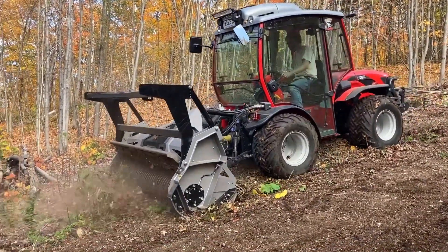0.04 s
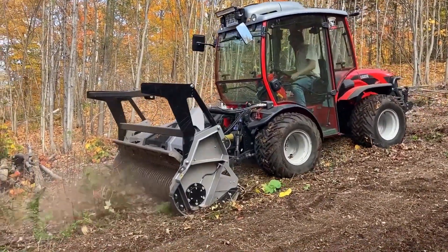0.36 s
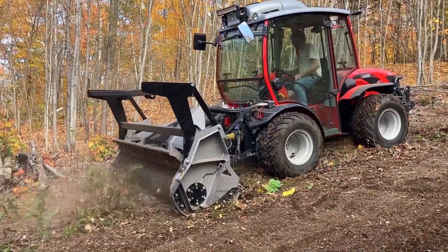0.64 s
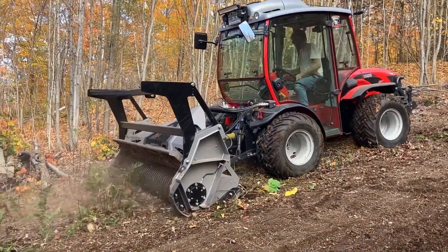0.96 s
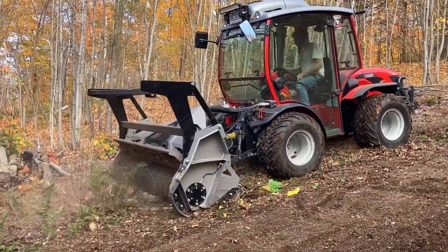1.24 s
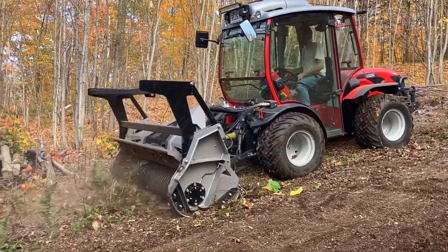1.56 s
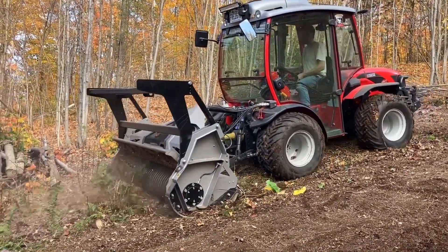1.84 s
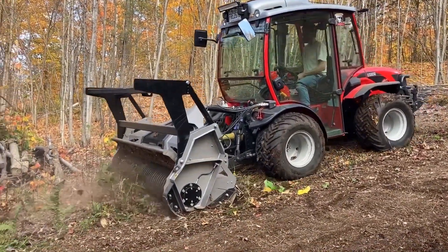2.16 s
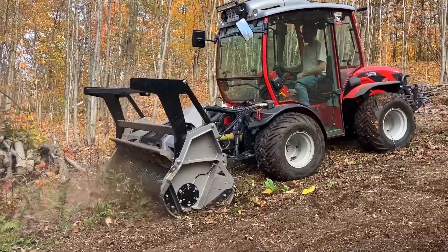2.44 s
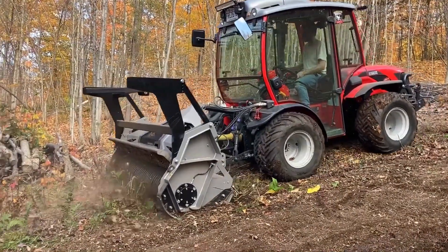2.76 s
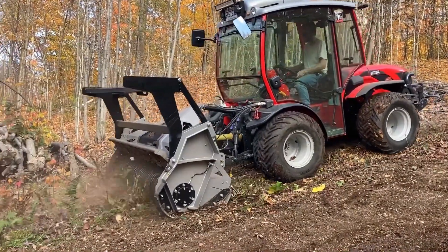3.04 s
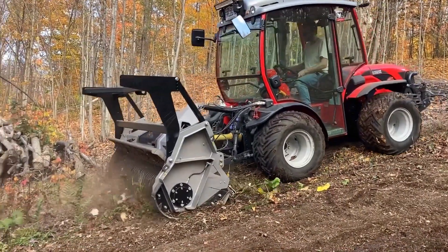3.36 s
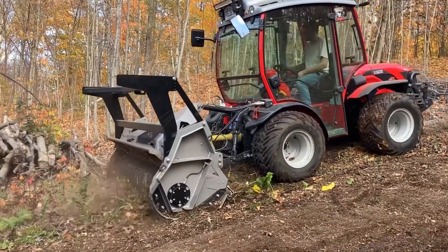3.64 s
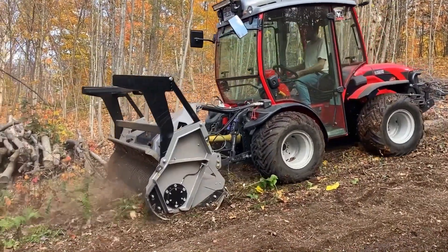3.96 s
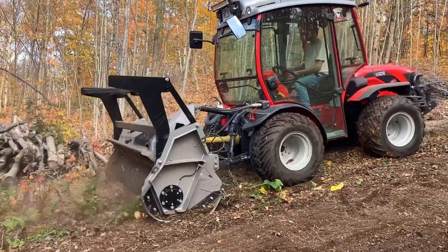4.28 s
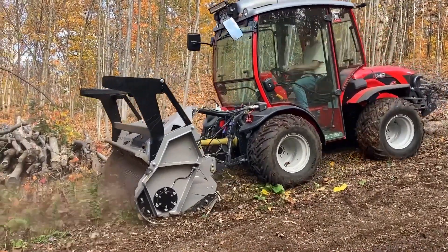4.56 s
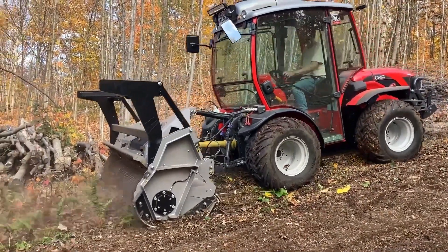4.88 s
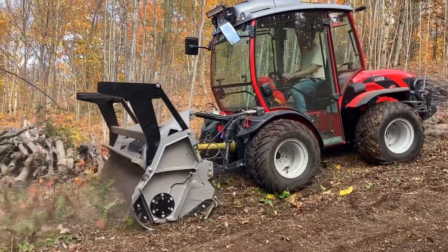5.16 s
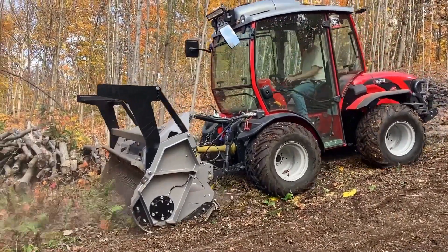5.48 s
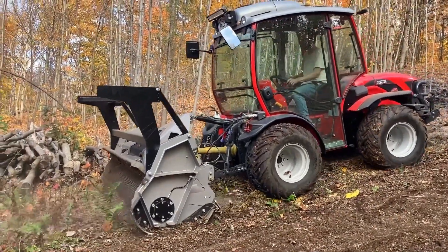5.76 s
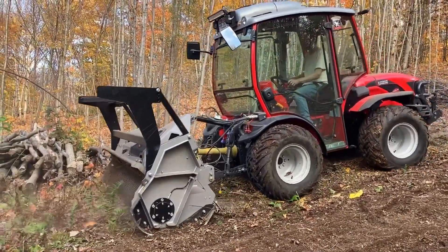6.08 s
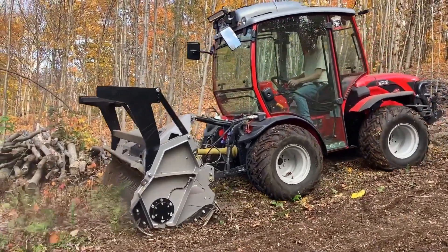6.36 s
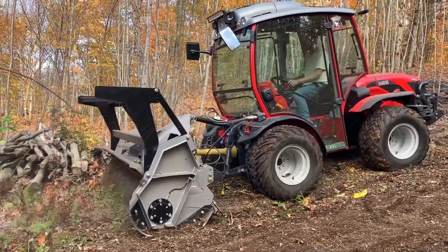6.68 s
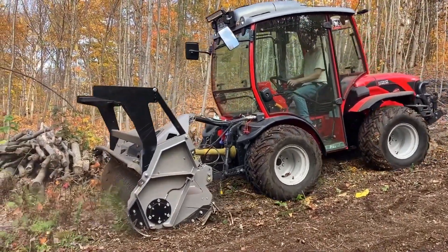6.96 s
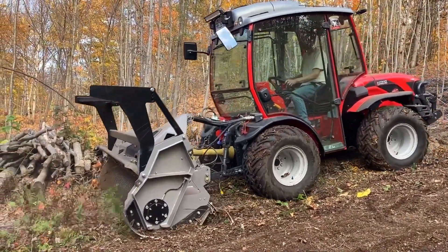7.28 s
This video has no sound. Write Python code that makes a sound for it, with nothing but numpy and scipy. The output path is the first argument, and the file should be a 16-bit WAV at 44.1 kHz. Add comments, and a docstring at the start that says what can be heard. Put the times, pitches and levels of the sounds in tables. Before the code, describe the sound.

A few metres away at the edge of a wood, a diesel tractor drones and clatters while its mulcher drum shreds brush in surges. Twigs snap, chunks knock against the steel hood, and chips and grit spray out. A little past halfway the drum pounds into thick wood and the engine bogs down, then recovers with a rising gear whine as the shredding thins.

```python
"""The toothed drum of a forestry mulcher chews through brush, a few metres away at the edge of a wood.
It thumps once a turn, shreds wood against its steel hood and sprays chips and grit.
Underneath, the diesel tractor that drives it drones and clatters. Near 4.3 s the drum bites into
something thick: the engine bogs down, then recovers with a rising gear whine."""
import sys
import numpy as np
from scipy import signal
from scipy.fft import rfft, irfft
from scipy.io import wavfile
from scipy.ndimage import uniform_filter1d

SR = 44100
rng = np.random.default_rng(int(sys.argv[2]) if len(sys.argv) > 2 else 0)


def dump_mix(stems):
    """Bounce the given channels to the path in sys.argv[1] as a 16-bit WAV at rate SR."""
    frames = np.atleast_2d(stems).T  # one column per channel
    limited = np.clip(frames, -1, 1)  # hard clip at full scale
    pcm = np.round(limited * 32767).astype(np.int16)
    wavfile.write(sys.argv[1], SR, pcm)


N = 327222
T = np.arange(N) / SR

# bright spectrum of a snap on a tooth: freq_hz, level_db
SNAP_SPECTRUM = [(2000,-23),(4500,-16),(5800,6.5),(7200,5),(9500,10),(12000,3),(16000,-1.5)]


def undb(db):
    """Decibels to gain."""
    return 10 ** (np.asarray(db) / 20)


def unit(x):
    """Scale to rms 1."""
    return x / np.sqrt(np.mean(x ** 2))


def together(*levels_db):
    """Level in dB of several unrelated sounds at once."""
    return 10 * np.log10(sum(undb(db) ** 2 for db in levels_db))


def curve(points):
    """Join (time_s, value) points, one value a sample."""
    return np.interp(T, *np.transpose(points))


def across(points):
    """Join (freq_hz, value) points on a log axis, one value an FFT bin."""
    hz, value = np.transpose(points)
    return np.interp(np.log(np.arange(N // 2 + 1) * SR / N + 1), np.log(hz + 1), value)


def colour(x, spectrum):
    """Causal filter with the given spectrum; rms 1."""
    cepstrum = irfft(np.log(undb(across(spectrum))), N)
    cepstrum[1:N // 2] *= 2
    cepstrum[N // 2 + 1:] = 0
    return unit(irfft(rfft(x) * np.exp(rfft(cepstrum)), N))


def ring(x, modes):
    """Drive a set of damped resonances; rms 1."""
    f = np.arange(N // 2 + 1) * SR / N
    response = sum((-1) ** k * undb(db) * 1j * f * width / (hz ** 2 - f ** 2 + 1j * f * width)
                   for k, (hz, width, db) in enumerate(modes))
    return unit(irfft(rfft(x) * response, N))


def walk(rate_hz):
    """Smooth random wander; rms 1."""
    step = max(int(SR / rate_hz), 2)
    held = np.repeat(rng.standard_normal(N // step + 2), step)
    return unit(uniform_filter1d(uniform_filter1d(held, step), step)[:N])


def noise():
    """Stereo white noise: one part is shared, the rest arrives by scattered paths."""
    # likeness of left and right: freq_hz, shared_power_fraction
    likeness = [(100,0.97),(350,0.99),(800,0.733),(1500,0.552),(2000,0.595),(3000,0.49),(6000,0.486),(8000,1),(15000,0.778)]
    alike = np.clip(across(likeness), 0, 1)
    spectra = rfft(rng.standard_normal((3, N)))
    return irfft(np.sqrt(alike) * spectra[0] + np.sqrt(1 - alike) * spectra[1:], N)


def grains(per_s, scatter_db):
    """Dense tiny impacts of unequal size, each a very short burst of noise."""
    hits = rng.random(N) < per_s / SR
    sizes = hits * undb(scatter_db * np.minimum(rng.exponential(size=N), 5))
    power = signal.lfilter([1], [1, -np.exp(-1 / (0.000658 * SR))], sizes ** 2)
    return unit(noise() * np.sqrt(power))


def throb(cycles, depth, decay):
    """A surge at the start of each cycle that dies within a share of it."""
    return unit(1 + depth * np.exp(-(cycles % 1) / decay))


def partial(turns, multiple, rough):
    """A tone at a multiple of the turning rate, uneven in strength and timing."""
    wobble = 1 + rough * (walk(22) + 1j * walk(22))
    return np.real(wobble * np.exp(2j * np.pi * multiple * turns))


def repeating(turns, size=256):
    """A pattern of contacts that comes round on every turn and slowly changes."""
    out = 0
    for _ in range(2):
        pattern = irfft(np.exp(2j * np.pi * rng.random(size // 2 + 1)))
        out = out + walk(3) * np.interp(turns % 1, np.arange(size) / size, pattern, period=1)
    return out / np.sqrt(uniform_filter1d(out ** 2, SR // 10) + 1e-9)


def swell(start_s, length_s, level_db, attack_s, fall_db_per_s):
    """Level in dB of one contact: it builds up, holds, then dies away."""
    rise = np.clip((T - start_s) / attack_s, 1e-6, 1)
    return level_db + 20 * np.log10(rise) - fall_db_per_s * np.maximum(T - start_s - length_s, 0)


def blows(events, decay_s, tail_db, tail_s):
    """Envelope of sudden blows, each with a quick fall and a longer tail."""
    envelope = np.zeros(N)
    for s, db in events:
        start = int(s * SR)
        age = T[:N - start][:SR // 4]
        shape = np.exp(-age / decay_s) + undb(tail_db) * np.exp(-age / tail_s)
        envelope[start:start + len(age)] += undb(db) * shape
    return envelope


def struck(events, spectrum, decay_s, tail_db, tail_s):
    """Each blow is a hard first contact and a short crumbling, heard through one spectrum."""
    contacts = np.zeros(N)
    for s, db in events:
        contacts[int(s * SR)] += undb(db)
    force = 4 * contacts + noise() * blows(events, decay_s, tail_db, tail_s)
    return colour(force, spectrum) * np.sqrt(np.mean(force ** 2))


def singing_panels(turns, fade_s=0.1415):
    """Shaft harmonics swell and fade as the load shifts and the body panels resonate."""
    # panel tones: start_s, length_s, shaft_harmonic, level_db
    tones = [(0.056, 0.572, 16, -36), (0.35, 1.345, 7, -42), (4.13, 0.31, 6, -29), (4.33, 0.21, 17, -33.5),
             (4.55, 0.31, 15, -38), (4.526, 0.93, 7, -28.5), (4.6, 0.52, 12, -35), (5.019, 0.3237, 17, -33),
             (5.019, 0.478, 19, -34.5), (5.168, 0.595, 12, -40.5), (5.823, 0.522, 17, -35),
             (5.647, 1.4, 6, -34), (5.85, 0.997, 8, -35)]
    out = 0
    for start, length, harmonic, db in tones:
        fade = np.clip(np.minimum(T - start, start + length - T) / fade_s, 0, 1)
        tone = unit(partial(turns + rng.random(), harmonic, rough=0.4))
        out = out + tone * np.sin(np.pi / 2 * fade) * undb(db)
    return out


def gear_whine(turns, speed, fuel):
    """Gears sing under torque, loudest at their case's resonances; backlash makes them flutter."""
    # faint overtones and sidebands, played slightly flat: mesh_multiple, shaft_offset, level_db
    side_tones = [(1, -2, -48), (1, 2, -48.5), (1, 1, -53), (3, 0, -53.5), (4, 0, -61.5), (4, 2, -59)]
    mesh_per_turn, case_hz, case_width_hz = 29.55, 1139, 29.3
    upper_case_hz, upper_width_hz = 2066.4, 74
    entry = np.clip((T - 4.72) / 0.057, undb(-15.5), 1)  # faint until the engine has bogged
    mesh = mesh_per_turn * turns + 0.0744 * walk(70)
    mesh_hz = mesh_per_turn * speed
    lift_db = 12 / (1 + (2 * (mesh_hz - case_hz) / case_width_hz) ** 2)
    tone = unit(partial(mesh, 1, rough=0.42)) * undb(-48 + 10 * fuel + lift_db + 1.2 * walk(5))
    octave_detune = 2 * (2 * mesh_hz - upper_case_hz) / upper_width_hz
    octave = unit(partial(mesh, 2, rough=0.43)) * undb(-37) / np.hypot(1, octave_detune)
    sides = sum(unit(partial(k * mesh + offset * turns, 0.981, rough=0.81)) * undb(db)
                for k, offset, db in side_tones)
    return entry * (tone + octave + sides)


def diesel_clatter(turns, clatter_db):
    """Diesel knock twice a turn, and a rattle of the drive that rings the guard panels."""
    # spectrum of knock and rattle: freq_hz, level_db
    spectrum = [(200,-24.5),(440,-8),(520,-2),(640,1),(810,0),(920,-11),(1150,-4),(1550,-10),(2000,-18),(2700,-11.5),(3400,-15.5),(5500,-19.5),(16000,-48)]
    # sharp resonances of the thin guard panels: pitch_hz, width_hz, level_db
    panel_modes = [(617.1,52,0),(684.3,36.4,4.5),(802.8,31,-5),(1142.9,25.3,3),(1250,21,-4.5),(1426.6,10.1,-0.5),(1790,10.8,-18),(2093.6,45.5,-5)]
    knock = colour(noise() * throb(2 * turns, depth=0.15, decay=0.071), spectrum)
    contacts = repeating(turns) * undb(2.63 * walk(30))
    rattle = colour(contacts, spectrum) * undb(-3)
    panels = ring(contacts + 0.5 * noise(), panel_modes) * undb(-7.5)
    tight = np.clip((clatter_db + 35.5) / 12, .05, .7)  # torque takes up slack: a regular rattle
    return (np.sqrt(1 - tight) * knock + np.sqrt(tight) * rattle + panels) * undb(clatter_db)


def drive_drone(turns, speed, fuel, pound_db, drone_db, boom_db):
    """Four cylinders hum and rumble; under load the drum adds its thump and the hood booms."""
    # the engine running free: harmonic, level_db
    free_harmonics = [(1,-21.5),(2,-4),(3,0.5),(4,3),(5,0.5),(6,-1),(7,-5.5),(8,-8),(9,-9),(10,-13)]
    # the engine while the drum pounds on wood: harmonic, level_db
    loaded_harmonics = [(1,-17),(3,-8.5),(4,3),(5,-1.5),(6,-2.5),(7,-5),(8,-6),(9,-4.5),(10,-5),(11,-7.5),(12,-9.5),(13,-11),(14,-11)]
    # low rumble of the engine: freq_hz, level_db
    rumble_spectrum = [(20,-56.5),(40,-27.5),(60,-12),(90,-9),(125,-9),(160,-1.5),(200,-8),(280,-6),(340,-12),(420,-27.5),(700,-40.5),(2000,-75)]
    belt_ratio = 0.99  # engine turns per drum turn, so the two beat
    load = np.clip((pound_db + 39) / 10, 0, 1)
    bog = np.clip((pound_db + 27) / 5, 0, 1)
    labour = np.maximum(load, fuel ** 2)  # a labouring engine fires hard and evenly
    tuned = np.clip(speed - 38 + 0.34, 0, 1)  # at full speed four tooth rows meet the hood's pitch
    lag = rng.random(size=16)  # pipe and body resonances delay each harmonic by part of a turn
    free = unit(sum(undb(db) * partial(belt_ratio * turns - lag[k], k, rough=0.392)
                    for k, db in free_harmonics))
    buzz = unit(sum(undb(db + 2.5 * walk(4)) * partial(turns - lag[k], k, rough=0.25)
                    for k, db in loaded_harmonics))
    hum = (1 - 0.484 * labour) * free * undb(-3.5) + labour * buzz * undb(-6.5 - 0.47 * bog)
    thump = np.sqrt(load) * drum_thump(turns, tuned, bog) * undb(pound_db + 0.89 - 6.56 * bog)
    rumble = colour(noise() * throb(turns, depth=0.245, decay=0.72), rumble_spectrum)
    rumble *= undb(-5 - 3.91 * labour + 4.43 * bog)
    boom = tuned * partial(turns - lag[4], 4, rough=0.324) * undb(boom_db)
    return thump + (hum + rumble) * undb(drone_db) + boom


def chip_ticks(spray_db, faint_per_s=7.5, rise_s=0.00116, decay_s=0.0064):
    """Chips land on the housing and ring it briefly, each spot at its own pitch."""
    # distinct ticks: start_s, level_db, pitch_hz
    ticks = [(1.773, -34, 4270), (1.86, -32, 4430), (1.923, -31, 4400), (2.242, -32, 4280),
             (2.7, -32, 4450), (2.718, -27, 4392), (3.0235, -31.5, 4440), (3.5074, -32, 4380),
             (3.5329, -32, 4460), (3.562, -33, 4435), (3.6411, -31.5, 4500), (3.6985, -28.5, 4480),
             (6.985, -34.5, 4520)]
    faint_ticks = []
    for when, softness, spot in rng.random((round(faint_per_s * T[-1]), 3)):
        s = when * T[-1]
        db = np.interp(s, T, spray_db) - 14 - 8 * softness
        faint_ticks.append((s, db, 4555 + 221 * (2 * spot - 1)))
    out = np.zeros((2, N))
    for s, db, hz in [*ticks, *faint_ticks]:
        start = int(s * SR)
        age = T[:N - start][:SR // 20]
        cluster_hz = hz + 290 * rng.uniform(-1.036, 1, size=(5, 1))
        phases = rng.random(size=(5, 1)) + 0.74 * rng.random(size=(2, 5, 1))
        tone = np.sin(2 * np.pi * (cluster_hz * age + phases)).sum(axis=1) / np.sqrt(5)
        envelope = (1 - np.exp(-age / rise_s)) * np.exp(-age / decay_s)
        out[:, start:start + len(age)] += 2 * undb(db) * tone * envelope
    return out


def grit_spray(turns, spray_db, fuel):
    """Grit and dry leaves patter on steel and ground, duller when the drum slows."""
    # the spray at full speed: freq_hz, level_db
    spectrum = [(800,-29.5),(2500,-17),(4400,1.5),(5800,-5),(7400,0.5),(9000,3),(10500,2),(12500,0.5),(15500,-7.5)]
    # softer throw of a slowed drum: freq_hz, change_db
    dulling = [(4400, 1), (7300, -0.5), (10500, -5), (15000, -5)]
    gusts = throb(turns, depth=0.41, decay=0.215) * undb(walk(45))
    fast = colour(grains(per_s=5500, scatter_db=3.5) * gusts, spectrum)
    slow = irfft(rfft(fast) * undb(across(dulling)), N)
    return ((1 - fuel) * fast + fuel * slow) * undb(spray_db + 4.5)


def soil_thuds(pitch_hz=158):
    """The drum hits clods and roots with a dull thud."""
    # thuds: start_s, level_db
    thuds = [(2.558, -29.5), (2.935, -20.5), (3.059, -22), (3.225, -26.5), (3.684, -18.5), (3.758, -20),
             (3.989, -17.5), (4.719, -15.5), (7.405, -18)]
    tone = np.sin(2 * np.pi * pitch_hz * T + walk(40))
    return tone * blows(thuds, decay_s=0.0164, tail_db=-24.5, tail_s=0.048)


def wood_knocks():
    """Chunks of wood split and knock against the hood."""
    # chunks: start_s, level_db
    chunks = [(0.441, -25.5), (2.491, -26), (2.564, -20), (2.909, -23), (2.933, -22.5), (2.96, -25),
              (3.062, -23.5), (3.329, -27.5), (4.434, -24), (4.595, -25), (4.734, -22.5)]
    # wood on the steel hood: freq_hz, level_db
    knock_spectrum = [(100,-25.5),(300,-1.5),(700,10),(1300,10),(2000,-19),(3500,5),(6000,-28),(16000,-69)]
    # wood splitting along its grain: freq_hz, level_db
    crack_spectrum = [(500, -22), (1200, -2.5), (3700, -0.5), (8000, -10.5), (16000, -23.5)]
    knocks = struck(chunks, knock_spectrum, decay_s=0.0029, tail_db=-4, tail_s=0.0222)
    cracks = colour(grains(per_s=2500, scatter_db=1.5), crack_spectrum)
    cracks *= blows(chunks, decay_s=0.003, tail_db=-6, tail_s=0.0164)
    return knocks + cracks * undb(-4.5)


def twig_snaps(turns, spray_db, small_per_s=2, rehit_db=2):
    """Twigs and stones snap and ping the teeth; a few are hit again, harder, on the next turns."""
    # big snaps: start_s, level_db, ping_offset_db, hit_count
    big_snaps = [(0.0448, -21.5, -11, 1), (0.2857, -19, -1, 1), (0.3102, -18.5, -8.5, 1),
                 (0.3611, -22, -10, 1), (0.4135, -18, -19.5, 1), (0.4393, -16, -12, 1),
                 (0.9129, -24, -10.5, 1), (1.4117, -26, -3.5, 1), (1.848, -23, -5.5, 1),
                 (1.9228, -20.5, -16, 1), (1.9709, -14.5, -23.5, 1), (2.1603, -20, -2.5, 1),
                 (2.212, -21, -4.5, 1), (2.4656, -26, -13, 1), (2.4912, -19.5, -26.5, 1),
                 (2.675, -21, -4.5, 2), (2.908, -17, -5, 2), (2.958, -19, -0.5, 1), (2.942, -24, -8, 1),
                 (3.033, -18, 0.5, 1), (3.229, -22, -16, 1), (3.2782, -16.5, -10.5, 1),
                 (3.4187, -25, -15.5, 1), (3.436, -22.5, -16.5, 1), (3.7485, -25.5, 5, 1),
                 (4.067, -20, -20.5, 1), (4.861, -23, 4, 1), (5.031, -21, -1.5, 1), (5.09, -29, 1.5, 1),
                 (5.147, -22, -17.5, 1), (5.206, -20, -7, 1), (6.606, -22.5, -7.5, 1),
                 (6.672, -23.5, -1.5, 1), (6.8302, -25, -1, 2), (6.933, -26, -4, 3), (7.0346, -21, -1, 1),
                 (7.061, -12.5, -3, 1), (7.2466, -26, -4.5, 1), (7.322, -23, -18.5, 1)]
    # ring of the steel teeth: pitch_hz, width_hz, level_db
    tooth_modes = [(3502,190,2),(4423,123,6),(4965,290,5.5),(7200,272,5),(8370,87,0.5)]
    hits = []
    for s, db, ping, count in big_snaps:
        first_turn = np.interp(s, T, turns)
        hits += [(np.interp(first_turn + k, turns, T), db + k * rehit_db, ping) for k in range(count)]
    chances = rng.random(int(turns[-1]))  # small snaps come at random, riding on the spray's level
    for turn, (size, hardness) in enumerate(rng.standard_normal((len(chances), 2))):
        if chances[turn] < small_per_s * T[-1] / turns[-1]:
            s = np.interp(turn, turns, T)
            hits.append((s, np.interp(s, T, spray_db) + 10 + 2.9 * size, 0.5 + 3 * hardness))
    snap_hits = [(s, db) for s, db, _ in hits]
    ping_hits = [(s, db + ping) for s, db, ping in hits]
    snaps = struck(snap_hits, SNAP_SPECTRUM, decay_s=0.0016, tail_db=-18, tail_s=0.013)
    pings = ring(noise(), tooth_modes) * blows(ping_hits, decay_s=0.00277, tail_db=0, tail_s=0.0222)
    return snaps * undb(-2) + pings * undb(-12)


def wood_rasp(turns):
    """Teeth saw through thick wood in rough strokes, twice a turn."""
    # the rasp: freq_hz, level_db
    spectrum = [(1500,-29),(2600,-20),(3000,4),(3500,-8.5),(4400,-2),(5500,-8.5),(9000,-23),(16000,-37.5)]
    strokes = grains(per_s=2800, scatter_db=-1.5) * throb(2 * turns, depth=1.03, decay=0.35)
    rasp_db = swell(start_s=4, length_s=0.35, level_db=-34, attack_s=0.05, fall_db_per_s=72.5)
    return colour(strokes, spectrum) * undb(rasp_db)


def stump_chops(turns, at_turn=0.115, decay_turns=0.131, attack_s=0.063):
    """One proud tooth chops at a stump on every turn: a hard woody knock with a crack on top."""
    # runs of chopping: start_s, length_s, level_db, fall_db_per_s
    runs = [(-0.02, 0.73, -35, 19), (1.27, 0.217, -36, 60.5), (4.348, 0.395, -27.5, 110),
            (5.042, 1.172, -44, 24.5)]
    # the woody knock: freq_hz, level_db
    spectrum = [(200,-25),(450,-9.5),(620,3.5),(850,-6.5),(1120,4.5),(1400,-6.5),(1600,-3.5),(2100,-3.5),(2420,2),(2750,-22),(3500,-19),(6000,-22),(16000,-33)]
    chop_db = together(*(swell(s, length, db, attack_s, fall) for s, length, db, fall in runs))
    since_hit = (turns - at_turn) % 1
    blow = np.exp(-since_hit / decay_turns) * undb(1.2 * walk(40))
    knock = colour(blow * (noise() + 0.78 * repeating(turns)), spectrum)
    crack = colour(blow * grains(per_s=13000, scatter_db=8.5), SNAP_SPECTRUM)
    return (knock + crack * undb(-14)) * undb(chop_db)


def drum_thump(turns, tuned, bog):
    """Low harmonics line up in one blow a turn; a bogged engine barks on the third and fourth."""
    # ring of the hood's hollow at full speed: shaft_harmonic, level_db
    hollow_harmonics = [(4, 4), (5, -0.5), (7, -5.5)]
    phase = turns - 0.5  # the blow falls halfway through the turn
    thump = (1 - 0.31 * tuned) * partial(phase, 2, rough=0.02)
    thump += (0.777 + 0.9 * bog) * partial(phase, 3, rough=0.095)
    thump += 0.87 * bog * partial(phase, 4, rough=0.075)
    hollow = sum(undb(db) * partial(phase, k, rough=0.16) for k, db in hollow_harmonics)
    thump += tuned * (1 - bog) * hollow
    return -thump * undb(0.55 * walk(28))  # no two blows are equally hard


def drum_shredding(turns, shred_db, pound_db):
    """Teeth tear fibres in a surge on each turn; splinters crackle and ring the hood and its lip."""
    # the steel hood: pitch_hz, width_hz, level_db
    hood_modes = [(622,127,-13.5),(807,33,-14.5),(1166.4,41,-16.5),(1291,45,-7),(1406.8,9,-2),(1761.7,84.4,4),(1911.6,60.8,6),(2024.7,72.4,1.5),(3364,548,-10),(4634,260,-16.5)]
    # the hood's front lip: pitch_hz, width_hz, level_db
    lip_modes = [(2397, 104, 0)]
    # crackle of splinters: freq_hz, level_db
    splinter_spectrum = [(300,-30),(700,-1),(1200,2),(2200,2),(2800,-2),(3500,-12),(5000,-5.5),(8000,-13.5),(16000,-34.5)]
    surge = throb(turns, depth=0.146, decay=0.6) * undb(1.366 * walk(35))
    chips = (grains(per_s=3500, scatter_db=2.5) + 0.387 * repeating(turns)) * surge
    pressed = np.clip((pound_db + 32.5) / 10, 0, 1)  # a log pressing on the lip quiets it
    hood = ring(chips, hood_modes) * undb(1.5)
    lip = ring(chips, lip_modes) * undb(-4.5 - 6 * pressed)
    splinters = colour(grains(per_s=900, scatter_db=2.8) * surge, splinter_spectrum)
    return (hood + lip + splinters * undb(-6)) * undb(shred_db)


def stereo_image(x):
    """The sound reaches the two microphone ports out of step and at unequal levels."""
    # phase between the ports: freq_hz, left_lead_rad
    phase = [(0, 0), (1210, 0.23), (2410, 2.11), (2670, 2.11), (3360, 1), (4820, 4.0), (5600, 2.7),
             (6030, 2.16), (6720, 0.78), (9560, -3.7), (13200, -9.1), (14000, -9.5), (15200, -12.4),
             (16400, -12.5)]
    # balance between the ports: freq_hz, left_minus_right_db
    balance = [(60, -1.3), (110, -1.35), (200, -0.73), (380, -0.18), (700, -1.49), (1290, 0.68),
               (2380, 0.68), (4400, -1.1), (8120, -0.57), (15000, 0.0)]
    side = np.array([[.5], [-.5]])
    ports = undb(side * across(balance)) * np.exp(1j * side * across(phase))
    return irfft(rfft(x) * ports, N)


def scene():
    """Engine and drum share one drive line: its speed sets the rhythm, the bites lift the levels."""
    # shaft speed: time_s, rate_hz
    shaft_speed = [(0, 38.52), (0.4, 38.86), (1.35, 40.01), (1.9, 40.6), (3.1, 39.59), (4.15, 39.75),
                   (4.4, 38.63), (4.65, 35.72), (5.1, 34.66), (5.85, 35.28), (6.35, 36.5), (7.1, 39.06),
                   (7.42, 39.47)]
    # spray of dry leaves and grit under the drum: time_s, level_db
    litter = [(0, -35.5), (1.45, -44), (1.85, -39), (2.45, -41.5), (2.85, -41.5), (3.0, -37.5), (3.3, -37),
              (5.3, -36), (6.3, -45), (7.42, -49.5)]
    # teeth bite into wood, then the pieces clear from the hood:
    # start_s, attack_s, length_s, shred_db, boom_db, fall_db_per_s
    bites = [(-0.2, 0.197, 0.41, -25.5, -38, 14), (1.162, 0.082, 0.1017, -33.5, -43.5, 65.5),
             (1.74, 0.0867, 0.0847, -36.5, -45, 79.5), (2.468, 0.065, 0.1107, -29, -54.5, 72.5),
             (2.859, 0.203, 0.247, -26, -26.5, 31.5), (3.585, 0.06, 0.104, -34, -52.5, 15),
             (4.14, 0.087, 0.175, -26, -26.5, 33), (4.275, 0.195, 0.3213, -22, -40, 26.5),
             (4.656, 0.051, 0.095, -29, -40, 69.5), (4.613, 0.65, 0.825, -33.5, -31, 6)]
    # the drum rides on a log or stump and pounds it: start_s, length_s, level_db, fall_db_per_s
    pounds = [(-0.2, 1.29, -38, 34), (0.324, 0.128, -34, 61.5), (4.308, 0.444, -16.5, 89),
              (4.998, 1.256, -29.5, 58), (7.147, 0.19, -35.5, 49.5)]
    governed_hz, droop_hz = 40.86, 3.82
    soil_pound_db, pound_attack_s = -39.5, 0.105
    speed = curve(shaft_speed)
    turns = np.cumsum(speed * (1 + 0.0019773 * walk(12))) / SR
    fuel = np.clip((governed_hz - speed) / droop_hz, 0, 1)  # the governor adds fuel as speed sags

    light_brush_db = -42 - 3.5 * np.maximum(T - 6.01, 0)  # the brush thins out at the end
    shred_db = together(light_brush_db, *(swell(s, length, db, attack, fall)
                                          for s, attack, length, db, _, fall in bites))
    boom_db = together(*(swell(s, length, db, attack, fall)
                         for s, attack, length, _, db, fall in bites))
    pound_db = together(soil_pound_db, *(swell(s, length, db, pound_attack_s, fall)
                                         for s, length, db, fall in pounds))
    spray_db = together(curve(litter), shred_db - 11.5)  # bites throw out chips
    drone_db = together(-33 + 9 * fuel, shred_db - 5) + 0.11 * walk(4.74)  # and shake the engine
    clatter_db = together(-35 + 4 * fuel, shred_db - 10.5, pound_db - 8.5) + 1.246 * walk(7.3)

    machine = drive_drone(turns, speed, fuel, pound_db, drone_db, boom_db)
    machine += diesel_clatter(turns, clatter_db) + gear_whine(turns, speed, fuel)
    machine += singing_panels(turns)
    brush = drum_shredding(turns, shred_db, pound_db) + grit_spray(turns, spray_db, fuel)
    brush += twig_snaps(turns, spray_db) + wood_knocks() + soil_thuds()
    brush += stump_chops(turns) + wood_rasp(turns) + chip_ticks(spray_db)
    return stereo_image(machine + brush)


def record(dry):
    """A steep low-pass cuts the top above 16 kHz."""
    return signal.sosfilt(signal.ellip(10, .2, 80, 16000, fs=SR, output="sos"), dry)


dry = scene()
out = record(dry)
dump_mix(out)
```